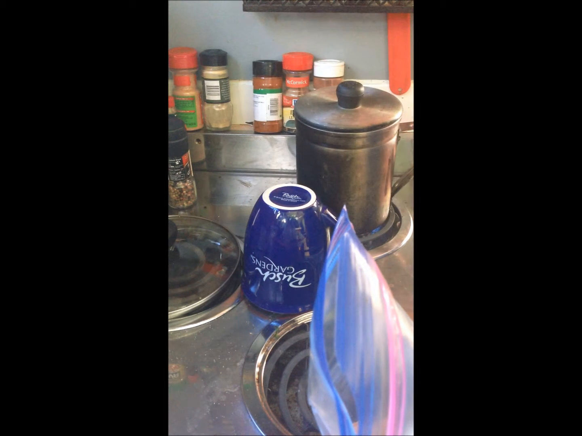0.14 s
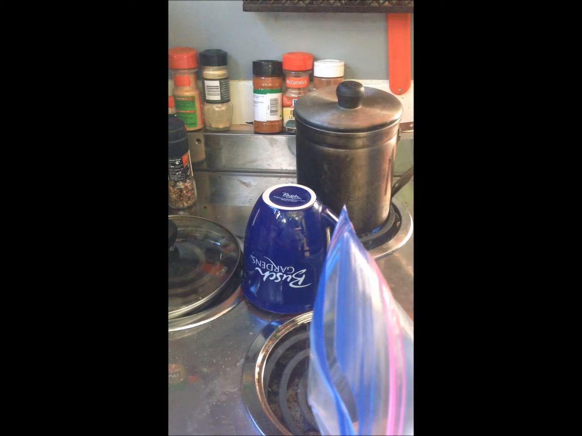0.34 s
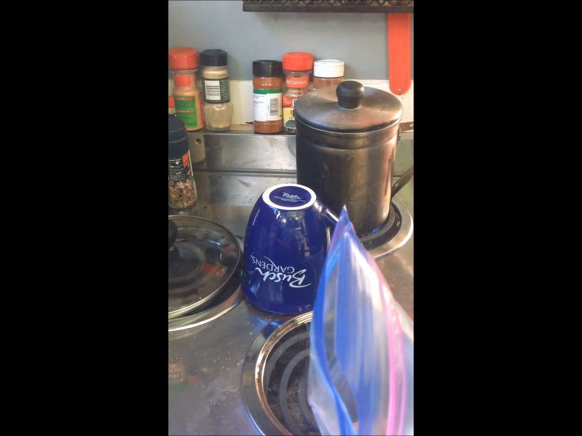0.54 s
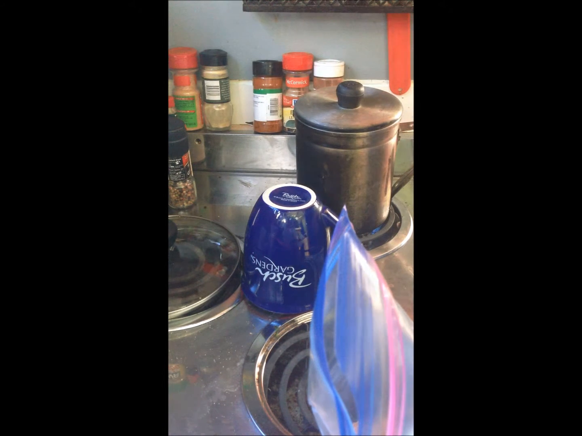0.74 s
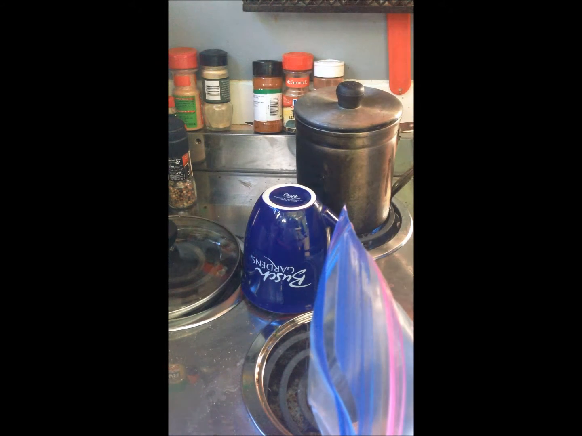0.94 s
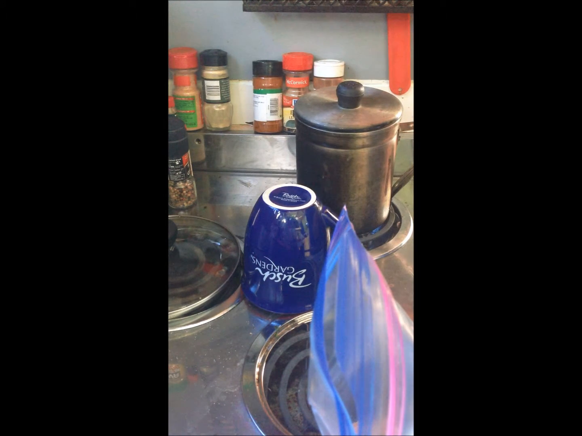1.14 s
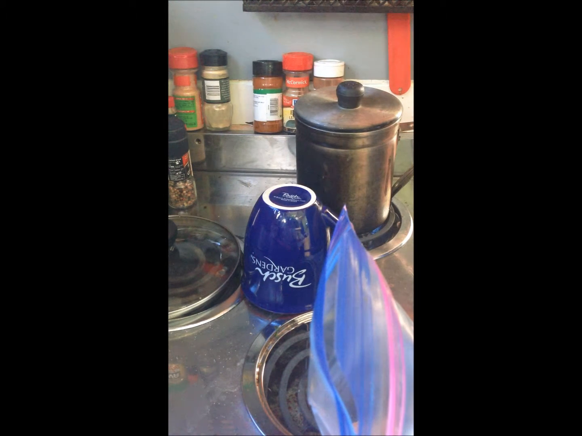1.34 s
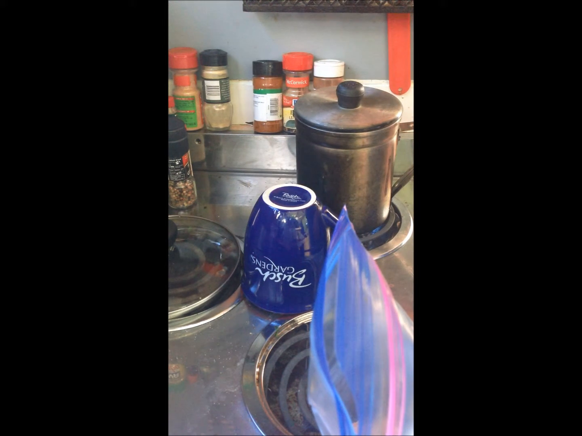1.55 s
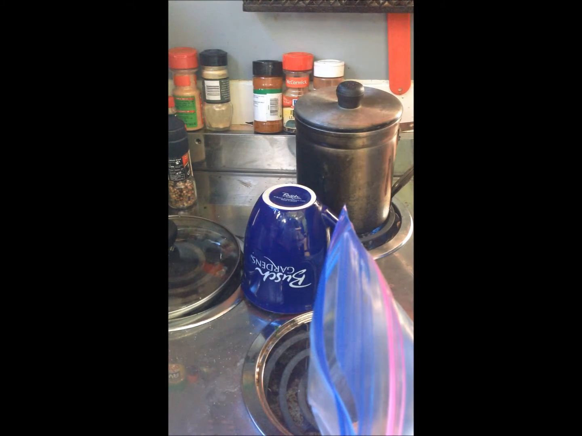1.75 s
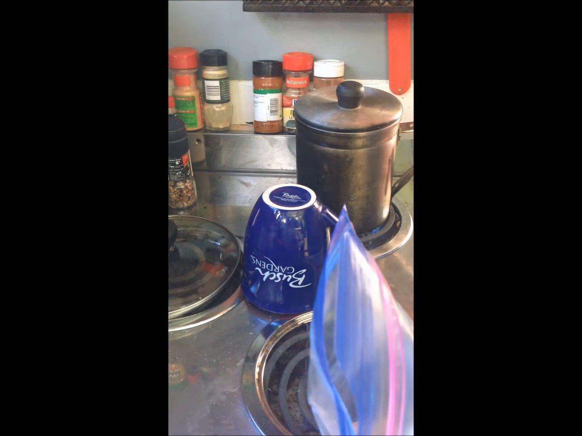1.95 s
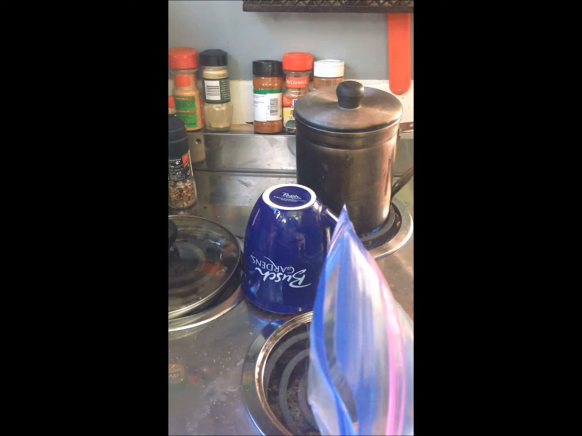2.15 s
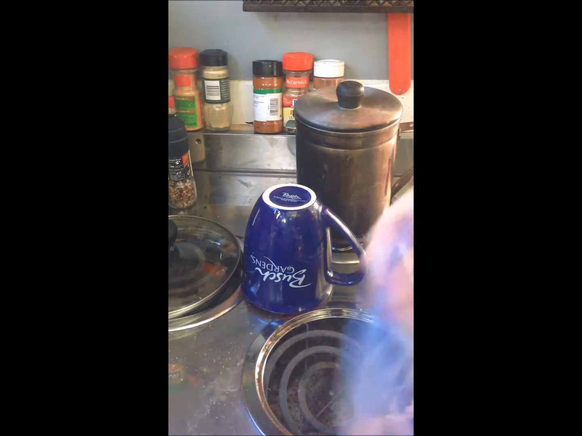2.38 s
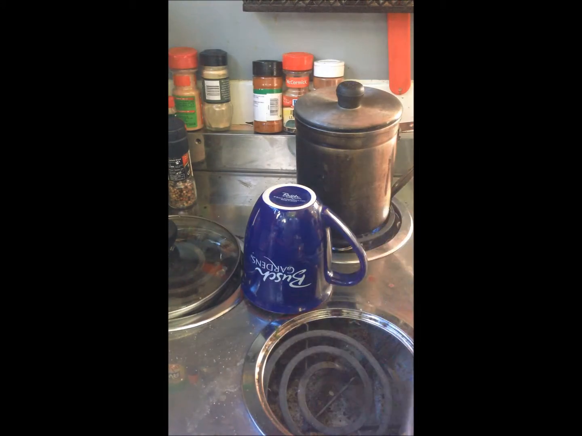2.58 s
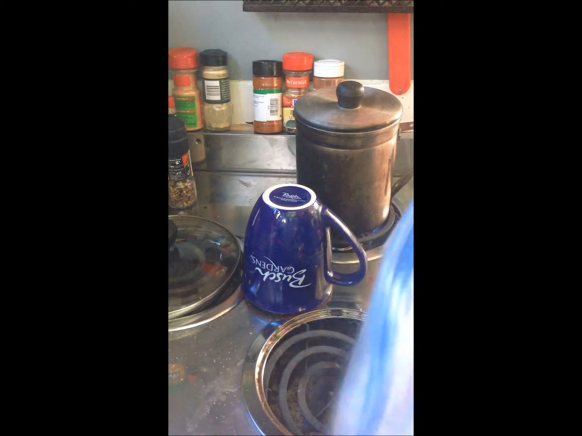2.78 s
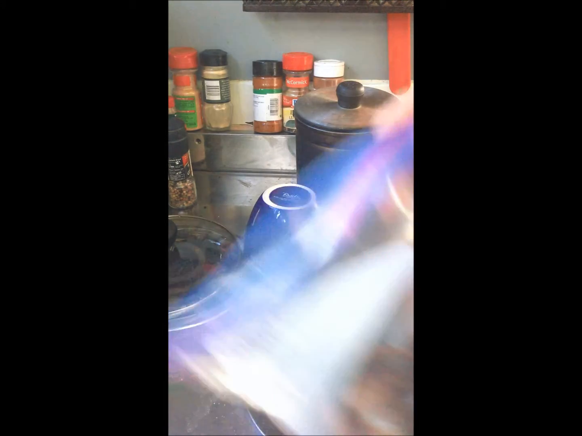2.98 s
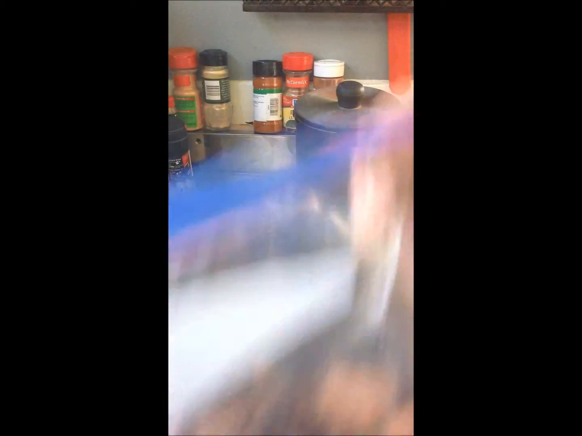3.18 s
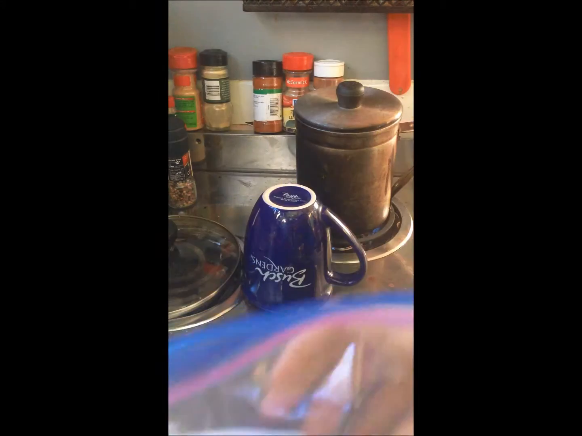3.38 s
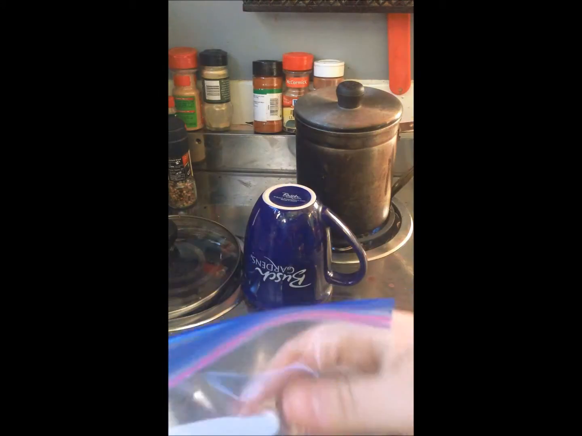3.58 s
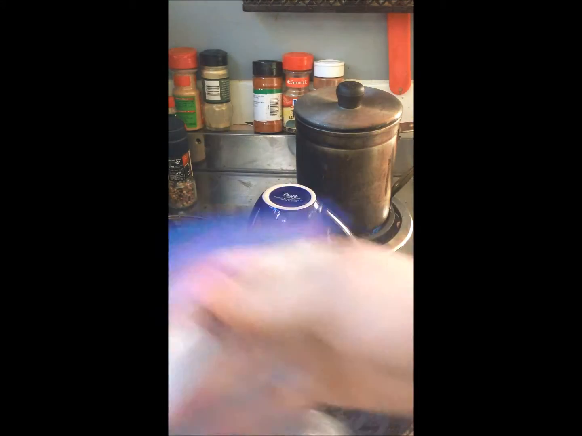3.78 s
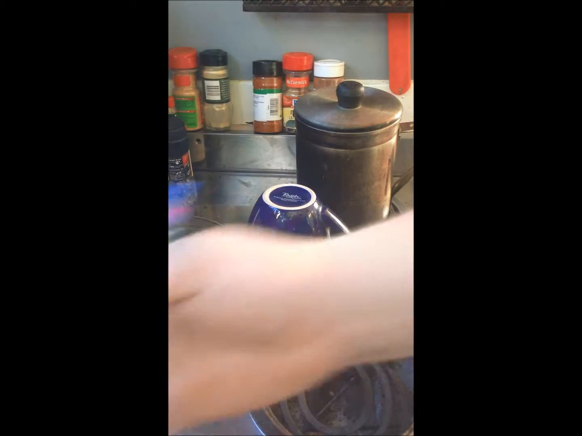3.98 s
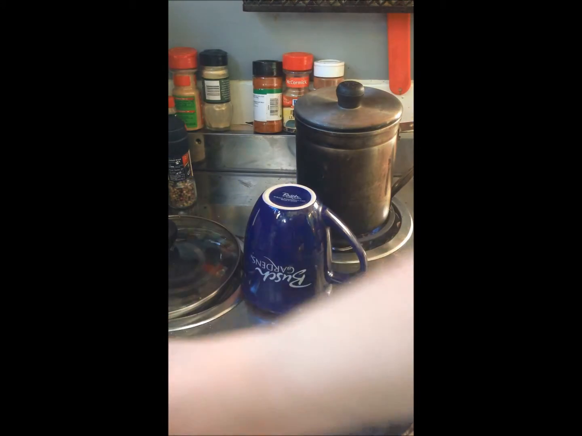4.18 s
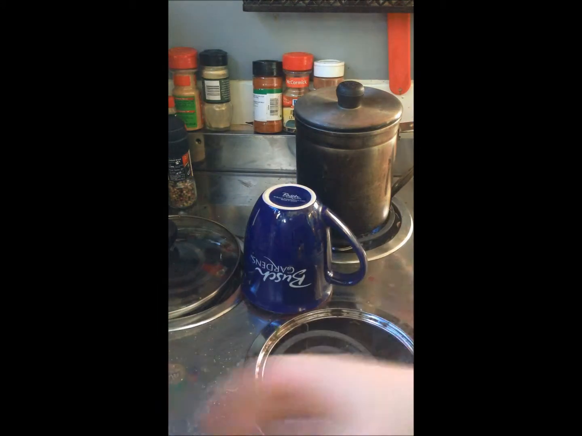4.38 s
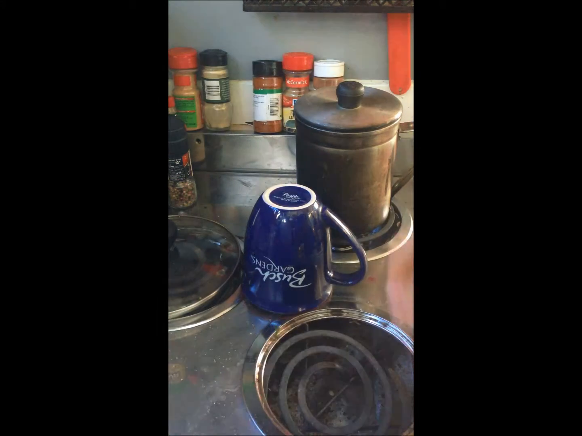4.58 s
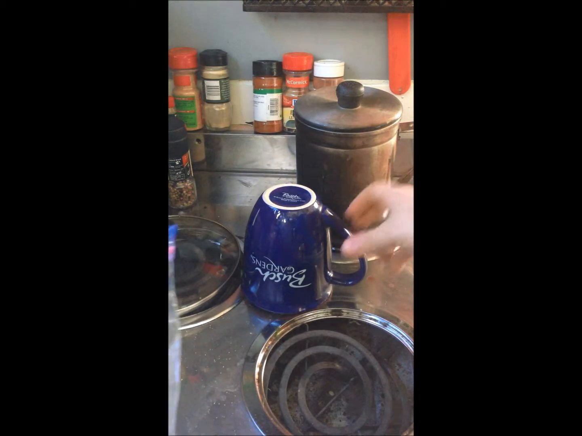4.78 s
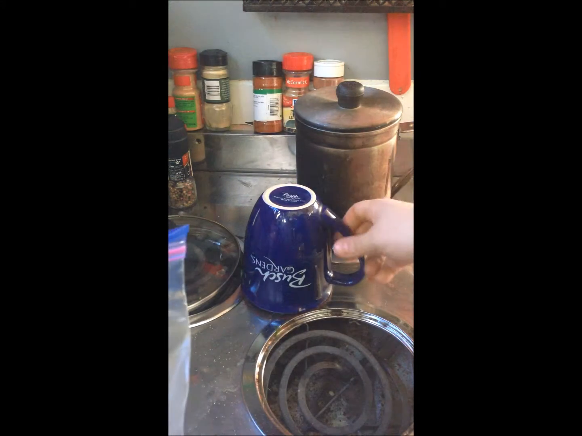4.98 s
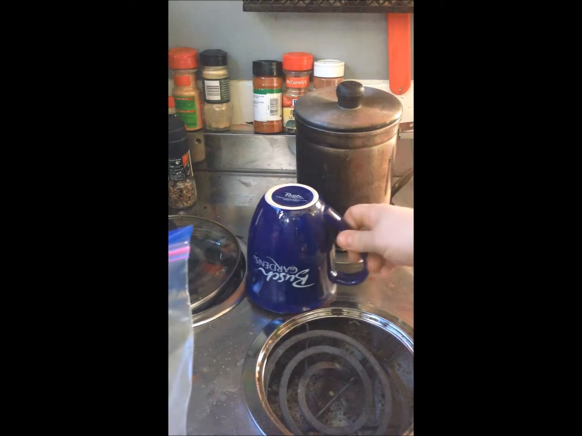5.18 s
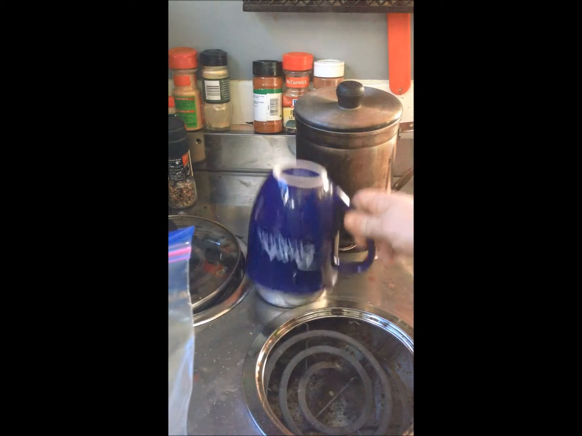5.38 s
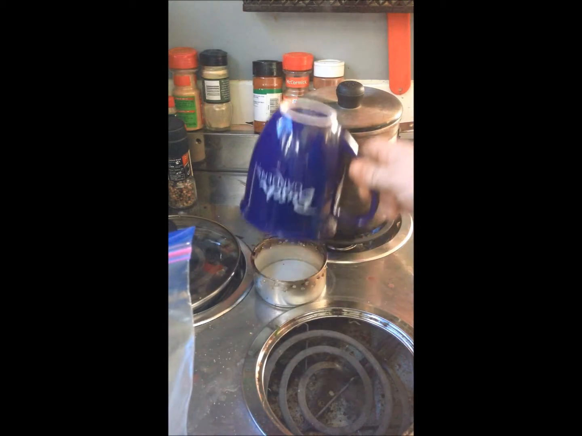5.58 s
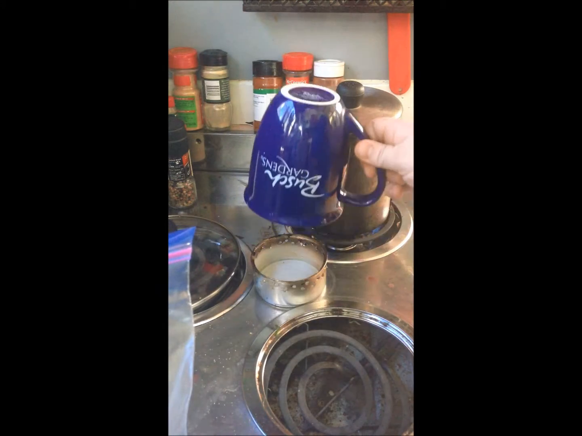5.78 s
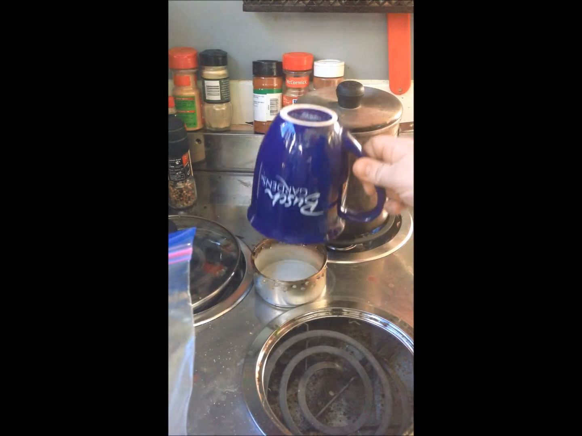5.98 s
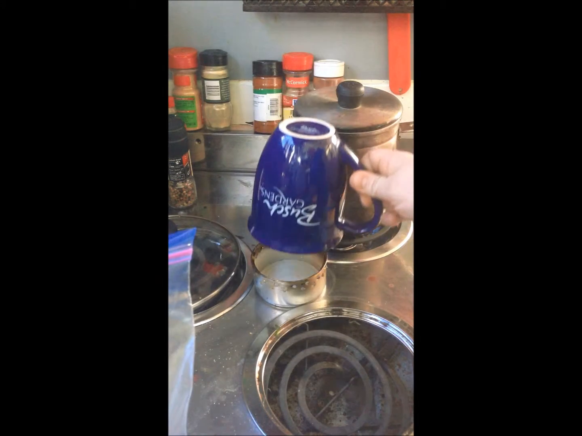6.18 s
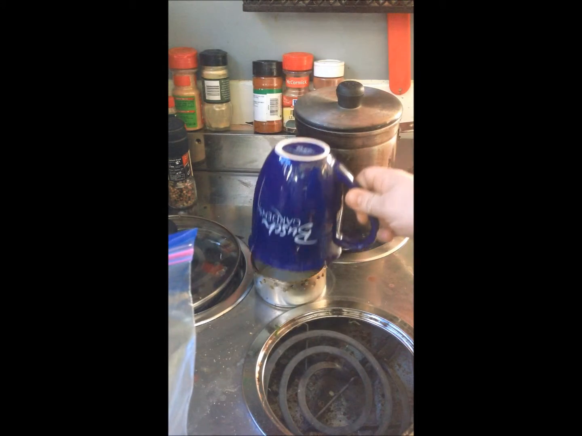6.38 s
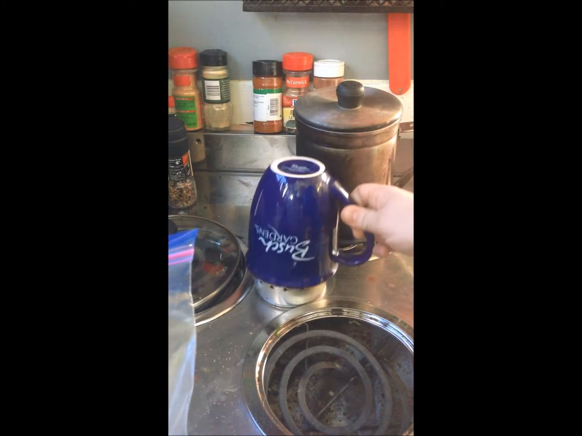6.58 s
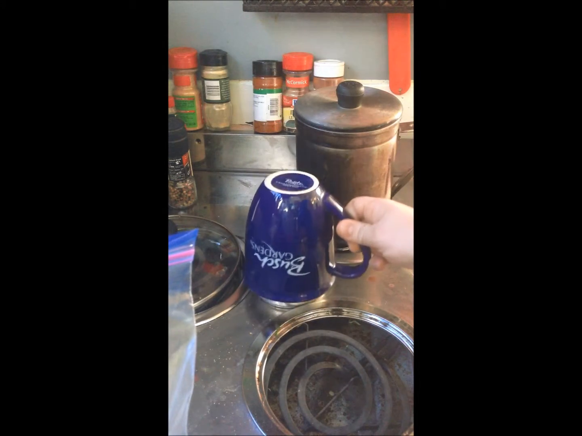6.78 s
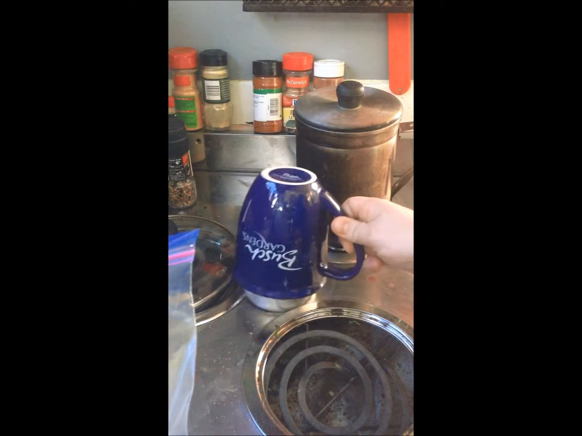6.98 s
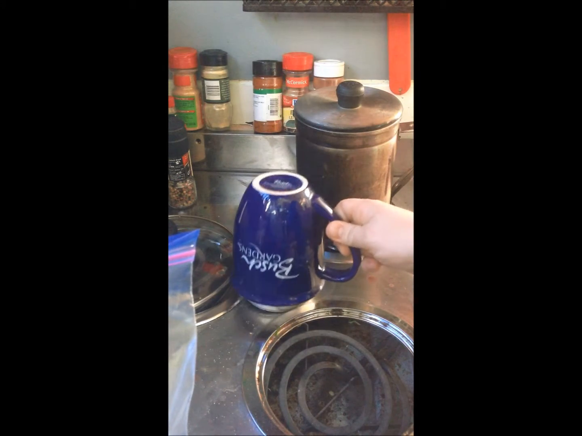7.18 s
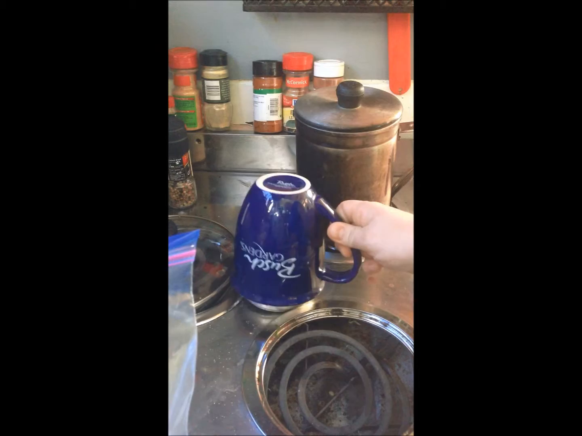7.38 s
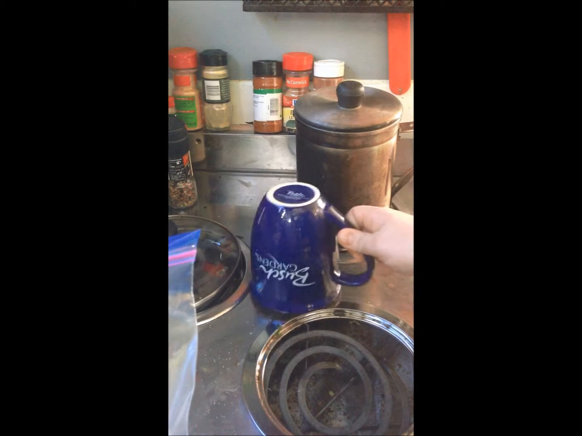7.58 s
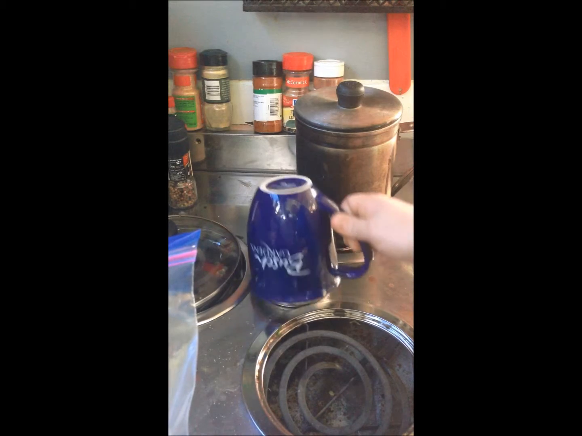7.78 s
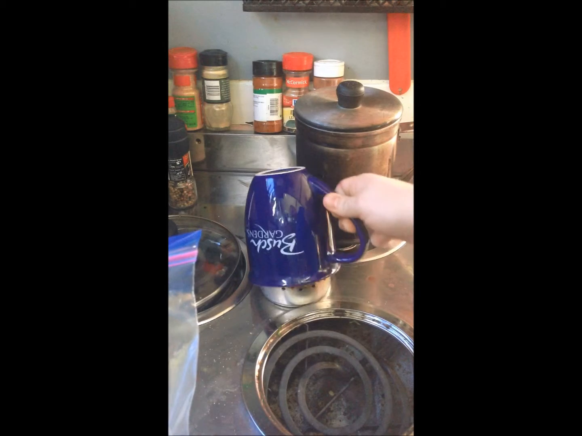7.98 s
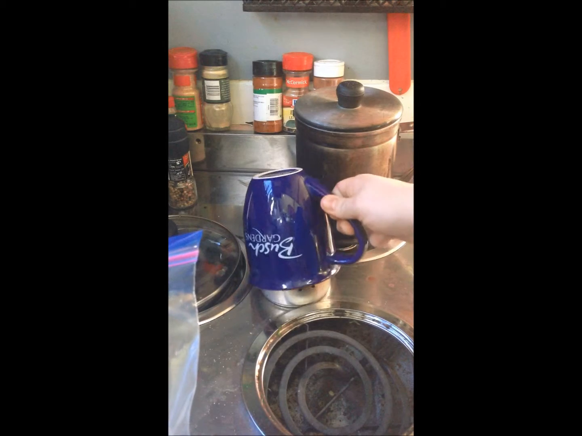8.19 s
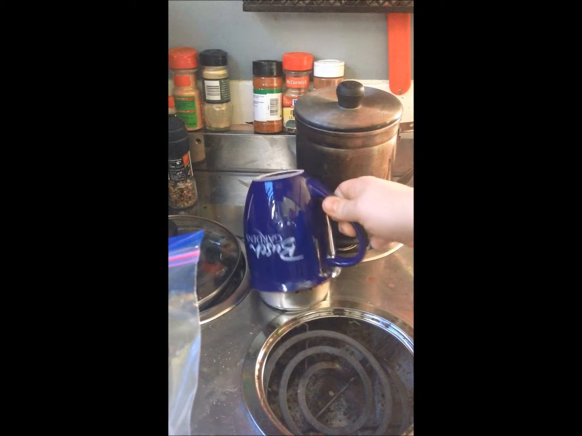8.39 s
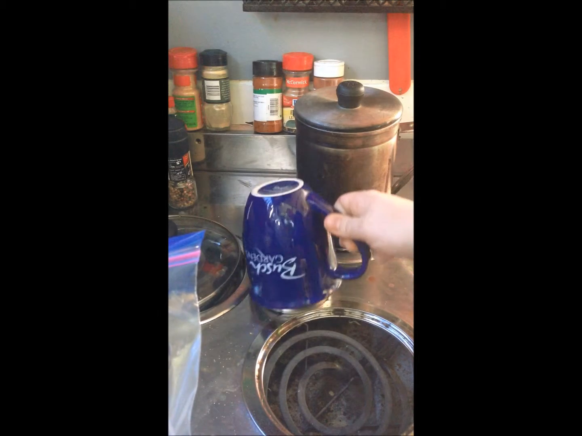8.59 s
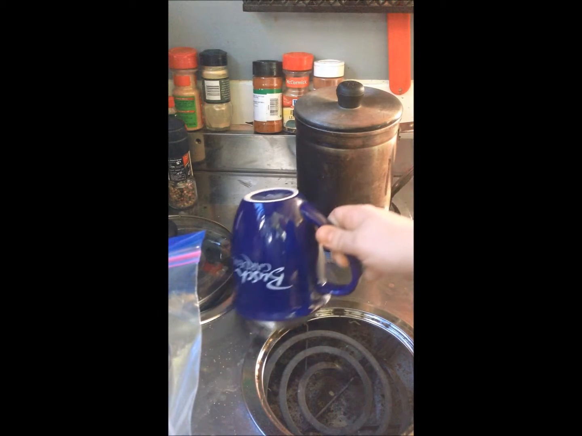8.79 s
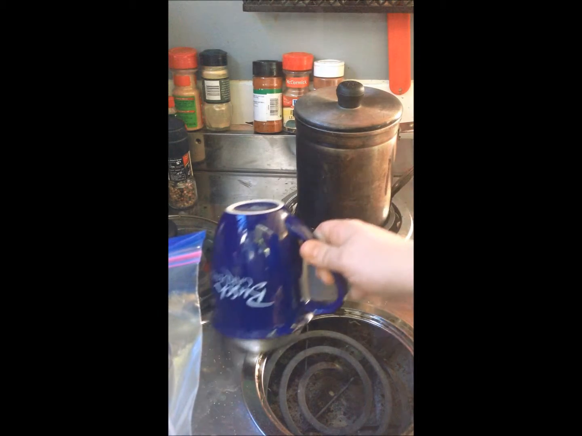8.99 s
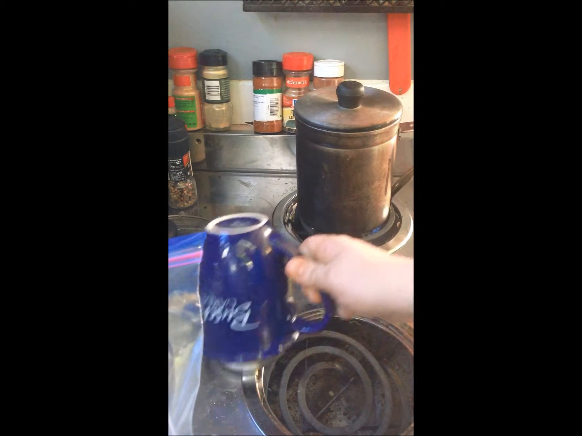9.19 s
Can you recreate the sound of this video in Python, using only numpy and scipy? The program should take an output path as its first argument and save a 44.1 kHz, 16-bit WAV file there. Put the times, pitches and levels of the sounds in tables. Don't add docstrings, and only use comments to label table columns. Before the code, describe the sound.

A small, dry kitchen heard close up, with thin airy vapour hiss, faint mains hum and distant low rumble that drops away around 1.5 s. The hiss weakens slowly, faintest near 8 s, then recovers. Small film ticks come early, with a soft crease and thump at 1.5 s. From 2.4 to 2.7 s a plastic bag crackles brightly; more crinkles at 2.8 s, then the sharpest snapping cluster at 3.35 s. Rustling and dull thuds on steel continue until a last crumple and bump at 4.15 s. After a lull, ceramic grazes and rubs from 5.2 s and clinks off metal at 5.5 s, the pipe sounding slightly hollower. It knocks back down at 6.6 s, strikes at 7.3 s, and seats with the loudest hollow clunk and scrape at 7.6 s. Light touches follow, a tick at 8.35 s, and a gritty drag from 8.7 s ending in a knock at 9.2 s.

```python
import sys
import numpy as np
from scipy import signal
from scipy.io import wavfile
from scipy.ndimage import uniform_filter1d

SR = 44100
rng = np.random.default_rng(int(sys.argv[2]) if len(sys.argv) > 2 else 0)


def inscribe(sig):
    pcm = np.round(np.clip(np.atleast_2d(sig).T, -1, 1) * 32767)
    wavfile.write(sys.argv[1], SR, pcm.astype(np.int16))


def convert_level_to_amplitude(level_db):
    exponent = np.asarray(level_db, float) / 20
    return 10 ** exponent


N = 407925
TIME = np.arange(N) / SR

# start_s, peak_db, pitch_hz, dull_part_db
SNAPS = [(2.4, -28.5, 2000, -14), (2.4468, -21, 7500, -11), (2.4797, -19, 2350, -27),
         (2.5053, -26, 2290, -23), (2.572, -25.5, 4440, -22), (2.6153, -18.5, 4730, -13.5),
         (2.6654, -33, 4690, -14), (2.8612, -30.5, 2400, 2), (2.896, -27.5, 2400, -18),
         (2.9867, -27, 2150, -22), (3.067, -27, 2150, -33), (3.23, -31, 3540, -14),
         (3.332, -15.5, 4740, -11), (3.3487, -9, 2330, -25), (3.3562, -16, 2350, -6),
         (3.3653, -17.5, 2470, 0.5), (3.398, -30, 2050, -20), (3.4178, -24.5, 4230, -16),
         (3.4256, -27, 4270, -25), (3.6409, -30, 3780, -14), (3.665, -26.5, 4000, -25),
         (3.7244, -23, 5390, -21), (3.737, -26, 2400, -20), (3.7548, -26, 2070, -16),
         (3.8116, -26.5, 2030, -2), (3.8442, -22, 2180, -15), (3.8605, -32, 6040, -6),
         (3.8786, -18.5, 2010, -8.5), (4.0827, -29.5, 4600, -6), (4.1745, -26, 4240, -16)]
# start_s, peak_db, pitch_hz
CRACKS = [(1.4955, -29, 1400), (2.418, -28, 4700), (2.420, -27, 2400), (2.4395, -29, 2000),
          (2.4625, -18, 8000), (2.463, -24, 6000), (2.468, -24, 4500), (2.474, -20, 4600),
          (2.4815, -17, 6800), (2.489, -24, 6500), (2.4977, -22, 2300), (2.512, -34, 1700),
          (2.8044, -29, 4950), (2.8134, -30, 1900), (2.8204, -20, 3600), (2.8235, -20, 2600),
          (2.8267, -23, 2200), (2.8459, -29, 2000), (2.8534, -30, 1500), (2.9761, -28, 3790),
          (3.3263, -26, 4300), (3.3295, -22, 4350), (3.339, -21, 2330), (3.3432, -22, 7500),
          (3.3508, -8, 5300), (3.3522, -10, 2500), (3.3545, -12, 3000), (3.3581, -17, 2110),
          (3.3631, -21, 3300), (3.3762, -24, 2370), (3.8442, -25, 6500), (3.7587, -23, 8740),
          (3.8395, -26, 6000), (3.8735, -29, 3900), (3.8863, -32, 3490), (4.0112, -30, 5990),
          (4.0716, -32, 6070), (4.0915, -31, 4000), (4.1165, -30, 4130), (4.1362, -29, 4600),
          (4.144, -22, 4800), (4.151, -21, 2600), (4.1588, -22, 4220), (4.1777, -29, 2370)]
# start_s, peak_db, dull_part_db, treble_db, t60_s
CRUMPLES = [(1.499, -27.5, -11, -14, 0.45), (2.1364, -30.5, -7, -24, 0.085),
            (2.4615, -17.5, -15, -17, 0.088), (2.4783, -19, -13, -27, 0.068),
            (2.6143, -27.5, -13, 2, 0.059), (2.803, -27, -11, -18, 0.085), (2.8195, -19, -31, -11, 0.11),
            (3.3176, -15, -17.5, -31, 0.15), (3.3492, -10.5, -9.5, -18, 0.019),
            (3.8024, -30, -1, -14, 0.11), (3.8644, -27, -22, -23, 0.077), (4.147, -20, -22, -24, 0.11),
            (4.1485, -30, 5, -23, 0.12)]
# start_s, peak_db
TICKS = [(0.169, -33), (0.3616, -40), (0.481, -38), (1.039, -34), (1.312, -35), (1.6165, -33),
         (1.6921, -41), (1.7818, -37), (1.87, -43), (3.3424, -31), (7.37, -38.5)]
# start_s, peak_db
SPARKS = [
    (2.4468, -34),
    (2.4625, -32),
    (3.3562, -24),
    (3.737, -31),
]
# time_s, motion_db
RUSTLE = [
    (2.3, -41.5),
    (2.57, -43),
    (3.13, -44),
    (3.75, -38),
    (3.97, -42),
    (4.26, -44),
    (4.55, -51),
]
# start_s, peak_db, pitch_hz
BUMPS = [(2.137, -38, 235), (2.409, -32, 228), (2.43, -39, 260), (2.468, -35, 280), (2.46, -33.5, 108),
         (2.819, -38, 170), (2.852, -41, 223), (3.028, -52, 247), (3.097, -41.5, 136), (3.322, -30, 234),
         (3.342, -26, 152), (3.481, -38, 209), (3.549, -41.5, 272), (3.599, -42, 231), (3.699, -38.5, 150),
         (3.745, -33, 214), (3.797, -28.5, 167), (3.862, -34, 194), (3.971, -35, 185), (4.075, -36.5, 167),
         (4.143, -25.5, 440), (4.152, -29, 270)]
# start_s, peak_db, pitch_hz, t60_s
BOOMS = [(1.494, -33, 1700, 0.015), (1.52, -34, 620, 0.12), (1.519, -36.5, 275, 0.12),
         (1.559, -48, 116, 0.15), (2.818, -24.5, 2400, 0.032), (3.807, -28, 1700, 0.03),
         (3.35, -44, 75, 0.13), (3.821, -46, 75, 0.31), (4.148, -34, 121, 0.064), (8.85, -49, 190, 0.57),
         (5.23, -41, 100, .2), (5.52, -46, 105, .2), (5.53, -36, 187, 0.14), (6.589, -26.5, 173, 0.14),
         (6.617, -39, 80, 0.21), (6.999, -44.5, 188, 0.2), (7.6, -28, 169, 0.12), (7.62, -32.5, 79.3, 0.44),
         (8.98, -34, 6360, 0.15)]

# start_s, force_db, trapped_air_db, glaze_ring_db, t60_s
KNOCKS = [(5.213, -47, 7, -1, 0.096), (5.224, -41, 5.5, -6, 0.19), (5.244, -43, 3.5, -2, 0.19),
          (5.466, -57, 18.5, 11.5, 0.29), (5.5155, -21, -11.5, 2, 0.088), (5.539, -25.5, -21, -21, 0.058),
          (6.577, -24.5, -4.5, -4, 0.09), (6.826, -45.5, 2, 2.5, 0.16), (6.87, -46.5, -2, -19, 0.043),
          (6.995, -59, 6, 4, 0.32), (7.284, -27.5, -8, -11, 0.045), (7.517, -34, 8, -1, 0.093),
          (7.536, -48.5, 12, 13.5, 0.21), (7.568, -36, 9, 3, 0.04), (7.587, -24.5, 9, 8.5, 0.059),
          (7.594, -18, -5, 2, .14), (7.665, -35, 8, 0, 0.068), (7.74, -45, 11, 1.5, 0.022),
          (7.824, -47.5, 12.5, -0.5, 0.069), (7.968, -40, -4, -12, 0.078), (8.342, -44, 7.5, 3, 0.22),
          (8.383, -45.5, 9.5, -3, 0.053), (8.627, -53, -2, 4, 0.2), (9.216, -31.5, 2.5, -2, 0.12)]
# pitch_hz, width_hz, level_db
HOLLOW = [(310, 24, -25), (354, 50, 1), (447, 98, 13), (514, 190, 4), (585, 39, -24), (695, 54, 5.5),
          (890, 280, 4)]
# pitch_hz, width_hz, level_db
CLANK = [(1180, 75, -14), (1744, 120, 3), (2030, 580, 5.5), (2400, 310, 8.5), (2600, 140, 1),
         (3080, 120, 0.5), (3430, 100, -13), (3540, 420, 5)]
# pitch_hz, width_hz, level_db
GLAZE = [(4600, 170, 5), (5480, 550, 3.5), (6120, 460, 3.5), (6620, 270, 2), (7580, 1200, 5.5),
         (8150, 138, -18), (8520, 1000, 0.5), (10200, 1700, -0.5), (12660, 2800, -10)]
# start_s, level_db
BLOWS = [
    (5.515, -23.5),
    (6.577, -23.5),
    (7.2845, -21.5),
    (7.588, -17.5),
]
# pitch_hz, level_db, t60_s
LIFT_MODES = [(628, -7, 0.11), (867, -6, .1), (1200, -6, .05), (1700, -12, .068), (2385, -5, .04),
              (3320, 2.5, .06), (3494, -9, 0.13), (5540, -1, .049), (5750, -1, .058), (6589, -12, .1),
              (7440, -4, .05), (8355, -8, .08), (8592, -7, .03), (10270, -14, .075)]
# pitch_hz, level_db, t60_s
LOWER_MODES = [(780, -7, .07), (1430, -7, 0.1), (1610, -5, 0.11), (2330, -5, .04), (2580, -9, .1),
               (3280, -7, .06), (3680, -3, .065), (3970, -12, .1), (4597, 1, .045), (5330, -11, .1),
               (6729, -15, .07), (7800, -16, .1), (8600, -16, .055)]
# pitch_hz, level_db, t60_s
RIM_MODES = [(704, 1, 0.08), (870, -4, .07), (1437, -14, .062), (2030, -1, .05), (2430, -4, .045),
             (2690, -2, .03), (3150, -8, .045), (3900, -6, 0.031), (4134, -11, .05), (4600, -7.5, 0.045),
             (5416, -14, .045), (6440, -27, .052)]
# pitch_hz, level_db, t60_s
SEAT_MODES = [(714, 1, .1), (880, 3, 0.064), (1690, -2, .06), (2216, -8, .15), (2530, -3, 0.099),
              (3138, -4.5, 0.13), (3300, -9, .15), (4020, -5, .03), (4440, -7, .096), (5469, -13, .15),
              (6169, -5, .082), (6870, -6, .072), (7639, -10, .1), (8070, -12, .13)]
# start_s, peak_db, pitch_hz, t60_s
GULPS = [
    (5.23, -22.5, 330, .068),
    (6.579, -20.5, 509, .068),
    (6.582, -18.5, 585, .05),
    (7.291, -22, 450, .045),
    (7.593, -8.5, 345, .035),
    (7.821, -24.5, 386, .055),
    (7.969, -28, 428, .05),
    (8.622, -29, 368, .06),
    (9.218, -24, 427, .068),
]
# start_s, peak_db, pitch_hz
PINGS = [
    (5.2115, -27, 4670),
    (5.5005, -36, 4600),
    (7.541, -32, 8150),
    (7.5685, -21.5, 4660),
]
# start_s, peak_db, pitch_hz
SLIPS = [(5.296, -37, 420), (5.32, -39, 343), (5.345, -43, 360), (5.421, -37, 393), (5.439, -37, 400),
         (5.475, -34.5, 417), (5.492, -35, 420), (6.947, -43, 420), (6.968, -39.5, 414), (7.009, -39, 447),
         (7.231, -39, 437), (7.547, -29, 414), (8.32, -47.5, 405), (8.781, -40, 407), (8.797, -41, 400),
         (8.819, -32.5, 377), (8.834, -37, 420), (8.861, -41, 410), (8.872, -35, 398), (8.887, -38, 410),
         (8.905, -41, 400), (8.93, -33, 414), (8.941, -36, 410), (8.956, -36, 420), (8.97, -39, 425),
         (9.114, -39.5, 382), (9.14, -42, 424)]
# start_s, peak_db, pitch_hz, t60_s
NOTES = [(5.257, -32, 300, 0.079), (5.255, -39, 520, .12), (5.295, -46, 870, .08), (5.465, -48, 640, .2),
         (5.212, -44, 7000, .03), (5.537, -27, 870, .07), (5.538, -22, 2400, .05), (7.513, -41, 6750, .5),
         (7.546, -33.5, 6700, .06), (7.535, -39, 9440, .06), (7.569, -32, 7900, .02),
         (7.569, -34, 1500, .08), (7.569, -35, 3500, .03), (7.611, -24, 6900, .05), (7.597, -22, 8900, .03),
         (8.63, -50, 650, .4), (7.369, -42, 6700, .012), (6.598, -22, 580, 0.053), (7.316, -38, 240, .2),
         (8.342, -38, 4600, 0.045), (8.345, -37, 2400, .03), (8.357, -38, 2400, .03),
         (8.343, -42, 8200, .08), (8.381, -47, 6300, .015), (3.318, -25, 4300, 0.01),
         (2.48, -27.5, 2300, 0.082), (6.579, -33, 1000, .04), (7.594, -11, 510, .035),
         (1.495, -36, 1000, .015), (4.005, -38, 250, .03), (4.193, -35, 350, .025),
           (5.517, -21, 7300, .025), (5.521, -24, 8400, .025), (5.524, -21, 5600, .04),
           (5.53, -24, 3400, .04), (6.59, -26, 300, .08), (6.824, -36, 400, .06), (6.848, -42, 880, .04),
           (6.866, -36, 480, .07), (6.996, -36, 410, .05), (7.286, -38, 11100, .06),
           (7.534, -39, 11000, .04), (7.6, -16, 300, .04), (7.667, -24, 400, .08)]
# start_s, end_s, trapped_air_db, pitch_hz, grit_db
DRAGS = [
    (1.75, 2.15, -70, 390, -60.5),
    (4.75, 5.2, -66, 340, -61.5),
    (5.226, 5.537, -54.5, 376, -54),
    (7.495, 7.77, -44, 340, -51.5),
    (8.315, 8.345, -70, 400, -50),
    (8.347, 8.5, -60, 300, -62),
    (8.69, 9.242, -59.5, 390, -49),
]

# time_s, pressure_db
VENT = [
    (0.0, 1),
    (1.7, -1.5),
    (2.58, -4),
    (5.18, -7.5),
    (5.74, -7),
    (7.34, -8.5),
    (8.1, -11),
    (8.7, -6.5),
    (9.25, -1),
]
# pitch_hz, level_db per Hz
HISS = [(24, -70), (40, -33), (123, -0.5), (146, -3.5), (357, -7), (506, -5.5), (588, -7.5), (875, -14.5),
        (1040, -15), (1240, -9), (2370, -7), (2890, -8), (4520, -5.5), (15300, -20)]
# pitch_hz, width_hz, lift_db
PIPE = [(1043, 80, 6), (1150, 40, 4), (1660, 45, 12.5), (2405, 92, 10), (3090, 66, 3), (3540, 50, 5.5),
        (3780, 70, 7), (4150, 90, 2.5), (4630, 270, 4.5), (5570, 120, 5.5), (6500, 220, 3.5), (7160, 60, 2),
        (8120, 100, 5), (8700, 90, 3.5)]
# pitch_hz, level_db
HUM = [(120, -68), (240, -83), (300, -83), (360, -86)]
# pitch_hz, t60_s
KITCHEN = [(100, 0.48), (500, 0.1), (2000, 0.12), (12000, 0.1)]
# pitch_hz, level_db
TREBLE_EDGE = [(0, 0), (15250, 0), (15450, -28), (16200, -40), (16500, -90), (22050, -90)]


def evened(x):
    return x / np.sqrt(np.mean(x ** 2) + 1e-20)


def read(points, hz):
    f, value = np.transpose(points)
    return np.interp(np.log(hz + 1), np.log(f + 1), value)


def add(mix, s, sound):
    part = mix[round(s * SR):][:len(sound)]
    part += sound[:len(part)]


def band(x, lo_hz, hi_hz):
    return signal.sosfilt(signal.butter(2, [lo_hz, hi_hz], "bandpass", fs=SR, output="sos"), x)


def resonate(x, hz, width):
    turn = np.exp(2j * np.pi * np.cumsum(hz * np.ones(len(x))) / SR)
    r = np.exp(-np.pi * width / SR)
    return 2 * (turn * signal.lfilter([1 - r], [1, -r], x / turn)).real


def body(modes):
    t = TIME[:4096]
    ring = 0
    for hz, width, db in modes:
        ring = ring + convert_level_to_amplitude(db) * np.sqrt(width) * np.exp(-np.pi * width * t) * np.sin(2 * np.pi * hz * t)
    return ring / np.linalg.norm(ring)


def chatter(size, spread_db):
    sizes_db = spread_db * np.minimum(rng.exponential(1, size), 4)
    return evened(rng.standard_normal(size) * convert_level_to_amplitude(sizes_db))


def burst(t60, rise, hold):
    t = TIME[:6000]
    return (1 - np.exp(-t / rise)) * convert_level_to_amplitude(-60 * np.maximum(t - hold, 0) / max(t60, .003))


def pop(t60):
    crack = np.pad([.6, 1.1, -.6], (0, 5997))
    tail = chatter(6000, 2) * burst(t60, .0002, .0004)
    return crack + .3 * tail


def thud(db, hz, t60, damping):
    push = rng.standard_normal(6000) * burst(t60, 0.0023, 0.005)
    push = resonate(resonate(push, hz, damping * hz), hz, 2 * damping * hz)
    return convert_level_to_amplitude(db) * push / abs(push).max()


def tone(db, hz, t60):
    wobble = uniform_filter1d(rng.standard_normal(6000), size=200)
    wobble = wobble * 6 * min(hz / 750, 1)
    phase = 2 * np.pi * (hz * TIME[:6000] + rng.random()) + wobble
    return convert_level_to_amplitude(db) * np.sin(phase) * burst(t60, 1 / hz + .0003, .004)


def snaps():
    out, dull = np.zeros((2, N))
    for s, db, hz, dull_db in SNAPS:
        crease = pop(.016)
        panel = 2.9 * resonate(crease, hz, 0.2 * hz)
        click = 0.9 * band(crease, 0.2 * hz, min(2.2 * hz, 12000))
        add(out, s, convert_level_to_amplitude(db + 2.0) * (panel + click))
        add(dull, s, convert_level_to_amplitude(db + dull_db + 3.5) * crease)
    return out + 4.0 * band(dull, 370, 1520)


def cracks():
    out, t = np.zeros(N), TIME[:600]
    rise = 1 - np.exp(-t / 0.00012)
    for s, db, hz in CRACKS:
        swing = np.sin(2 * np.pi * hz * t) * convert_level_to_amplitude(-60 * t * hz / 12)
        click = rng.standard_normal(600) * convert_level_to_amplitude(-60 * t / 0.0096)
        add(out, s - .0004, convert_level_to_amplitude(db) * rise * (swing + 0.36 * click))
    return band(out, 670, 11000)


def crumples():
    dull, film, treble = np.zeros((3, N))
    for s, db, dull_db, treble_db, t60 in CRUMPLES:
        rush = convert_level_to_amplitude(db - 9.5) * chatter(6000, 1.33) * burst(t60, 0.0015, 0.013)
        clumps = evened(uniform_filter1d(rng.standard_normal(6000), size=90))
        rush *= convert_level_to_amplitude(2.7 * clumps - 2.0)
        add(film, s, rush)
        add(dull, s, convert_level_to_amplitude(dull_db + 2.5) * rush)
        add(treble, s, convert_level_to_amplitude(treble_db + 1.0) * rush)
    return 1.54 * band(film, 1040, 5260) + 4.0 * band(dull, 370, 1520) + band(treble, 4100, 10000)


def rustle():
    s, motion_db = np.transpose(RUSTLE)
    moving = convert_level_to_amplitude(np.interp(TIME, s, motion_db, -120, -120) - 8.0)
    sizes = convert_level_to_amplitude(3 * np.minimum(rng.exponential(1, N), 4)) * rng.standard_normal(N)
    pops = (rng.random(N) < 500 / SR) * sizes
    tail = rng.standard_normal(300) * convert_level_to_amplitude(-60 * TIME[:300] / 0.0092)
    pops = signal.oaconvolve(pops, tail)[:N]
    slide_db = -64 + 0.16 * (motion_db + 42)
    sliding = convert_level_to_amplitude(np.interp(TIME, s, slide_db, -120, -120)) * evened(band(rng.standard_normal(N), 71, 370))
    return sliding + 1.54 * band(moving * evened(pops), 1040, 5260)


def bag_thuds():
    out = np.zeros(N)
    for s, db, hz in BUMPS:
        t60 = 0.075 if s < 3.65 else 0.039
        add(out, s, thud(db, hz, t60, .7))
    for s, db, hz, t60 in BOOMS:
        add(out, s, thud(db, hz, t60, .7 if hz < 500 else .25))
    return out


def ticks_and_sparks():
    out = np.zeros(N)
    for s, db in TICKS:
        add(out, s, convert_level_to_amplitude(db + 11.5) * band(pop(0.026), 3820, 14000))
    for s, db in SPARKS:
        add(out, s, convert_level_to_amplitude(db + 10) * band(pop(.015), 9000, 15000))
    return out


def knocks():
    air, wall, glaze = np.zeros((3, N))
    for s, db, air_db, glaze_db, t60 in KNOCKS:
        parts = ((air, air_db, 1.5, .003), (wall, 0, 1.1, .0006), (glaze, glaze_db, .8, .0003))
        for drive, part_db, slower, rise in parts:
            add(drive, s, convert_level_to_amplitude(db + part_db) * chatter(6000, 3.66) * burst(t60 * slower, rise, 0.0084))
    struck = ((air, HOLLOW), (wall, CLANK), (glaze, GLAZE))
    return sum(signal.oaconvolve(drive, body(modes))[:N] for drive, modes in struck)


def rings():
    tones = GULPS + NOTES
    tones = tones + [(s, db, hz, 0.018) for s, db, hz in PINGS]
    tones += [(s, db, hz, 0.065) for s, db, hz in SLIPS]
    for (s, blow_db), modes in zip(BLOWS, (LIFT_MODES, LOWER_MODES, RIM_MODES, SEAT_MODES)):
        tones += [(s, db + blow_db, hz, t60) for hz, db, t60 in modes]
    out = np.zeros(N)
    for s, db, hz, t60 in tones:
        add(out, s, tone(db, hz, t60))
    return out


def drags():
    slips = convert_level_to_amplitude(1.17 * evened(uniform_filter1d(rng.standard_normal(N), size=400)))
    grit = slips * signal.oaconvolve(chatter(N, 3), body(HOLLOW[-2:] + CLANK + GLAZE))[:N]
    rub, out = slips * rng.standard_normal(N), np.zeros(N)
    for start, end, air_db, hz, grit_db in DRAGS:
        span = slice(round(start * SR), round(end * SR))
        stroke = np.abs(np.sin(np.pi * (TIME[span] - start) / (end - start))) ** 0.31
        air = evened(resonate(resonate(rub[span], hz, 55.3), hz, 170))
        out[span] += convert_level_to_amplitude(air_db) * stroke ** 2 * air + convert_level_to_amplitude(grit_db) * stroke * grit[span]
    return out


def vent_hiss():
    frames, hz = N // 256 + 5, np.fft.rfftfreq(1024, 1 / SR)
    t = np.arange(frames) * 256 / SR
    a, b, patches = rng.standard_normal((frames, 513, 3)).T
    noise = a + 1j * b
    patches = uniform_filter1d(uniform_filter1d(patches, size=14, axis=0), size=10, axis=1)
    flicker = evened(uniform_filter1d(rng.standard_normal(frames), size=3))

    pipe_db = sum(db / (1 + (2 * (hz - f) / w) ** 2) for f, w, db in PIPE)
    pipe_db = pipe_db + 1.0 * rng.standard_normal(513) / convert_level_to_amplitude(pipe_db)

    s, pressure_db = np.transpose(VENT)
    push_db = np.interp(t, s, pressure_db)
    high = np.clip(np.log2(hz / 4000 + 1e-9), 0, 1)[:, None]
    low = np.clip(np.log2(hz / 500 + 1e-9), 0, 1)[:, None]
    follow_db = (1 - high) * (8.5 + 0.27 * push_db) + high * (16 + push_db)

    hollow_db = sum(db / (1 + ((hz - f) / 35) ** 2) for f, db in ((1350, 6), (1660, 2.5)))
    bag_db = np.outer(hollow_db, t < 2.4)

    field_db = (read(HISS, hz) + pipe_db)[:, None] + low * follow_db + bag_db
    field_db = field_db + 1.0 * evened(patches) + 0.9 * flicker
    hiss = signal.istft(noise * convert_level_to_amplitude(field_db), nperseg=1024, noverlap=768)[1][:N]
    plain = signal.istft(noise, nperseg=1024, noverlap=768)[1]
    return convert_level_to_amplitude(-76) * 30 * hiss / np.std(plain)


def pipe_notes():
    lifted_s, lowered_s, open_db, covered_db = 5.62, 6.64, -62.5, -68.5
    low, high = (evened(resonate(resonate(rng.standard_normal(N), hz, width), hz, 2 * width))
                 for hz, width in ((600, 55), (750, 45)))
    off = uniform_filter1d(1. * ((TIME > lifted_s) & (TIME < lowered_s)), size=2500)
    notes = 0.46 * high + 0.58 * low * np.where(TIME > lifted_s, 1, .3)
    return convert_level_to_amplitude(covered_db + (open_db - covered_db) * off) * notes


def rumble():
    running_db, rest_db, stops_s = -64, -71.5, 1.53
    running = uniform_filter1d(1. * (TIME < stops_s), size=9000)
    noise = evened(band(band(rng.standard_normal(N), 42, 83), 42, 83))
    return convert_level_to_amplitude(rest_db + (running_db - rest_db) * running) * noise


def mains_hum():
    return sum(convert_level_to_amplitude(db) * np.sqrt(2) * np.sin(2 * np.pi * (hz * TIME + rng.random())) for hz, db in HUM)


def kitchen():
    taps = np.zeros(SR // 2)
    at = np.arange(200, SR // 2 - 20, 20)
    taps[at + rng.integers(0, 20, len(at))] = rng.choice([-1., 1.], len(at))
    hz, t, z = signal.stft(taps, SR, nperseg=256)
    tail = signal.istft(z * convert_level_to_amplitude(-60 * t / read(KITCHEN, hz)[:, None]), SR, nperseg=256)[1]
    return tail / np.linalg.norm(tail)


def scene():
    bag = snaps() + cracks() + crumples() + rustle() + bag_thuds() + ticks_and_sparks()
    mug = band(knocks(), 142, 15300) + rings() + drags()
    near = band(bag + mug, 40, 18400)
    room = convert_level_to_amplitude(-12.0) * signal.fftconvolve(near, kitchen())[:N]
    background = vent_hiss() + pipe_notes() + rumble() + mains_hum()
    return np.tile(near + room + background, (2, 1))


def low_pass(x):
    return signal.sosfilt(signal.butter(12, 16360, fs=SR, output="sos"), x)


def record(dry):
    knee, room_above = .6, .33
    over = np.maximum(abs(dry) - knee, 0)
    limited = dry - np.sign(dry) * (over - room_above * np.tanh(over / room_above))
    hz, db = np.transpose(TREBLE_EDGE)
    edge = signal.firwin2(1023, hz, convert_level_to_amplitude(db), window=("kaiser", 8), fs=SR)
    mix = signal.oaconvolve(limited, edge[None], "same")
    return low_pass(mix)


dry = scene()
out = record(dry)
inscribe(out)
```